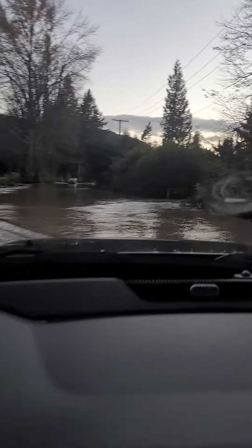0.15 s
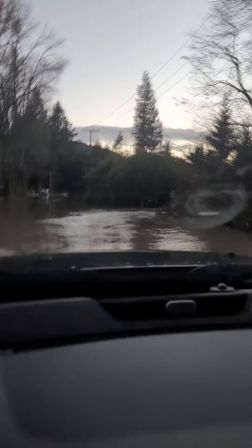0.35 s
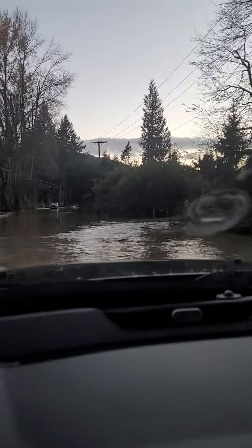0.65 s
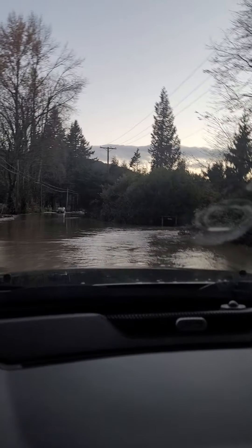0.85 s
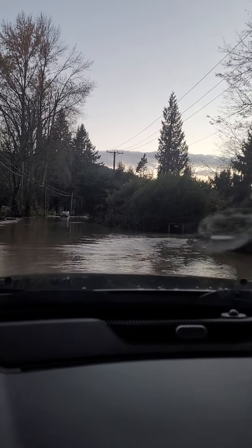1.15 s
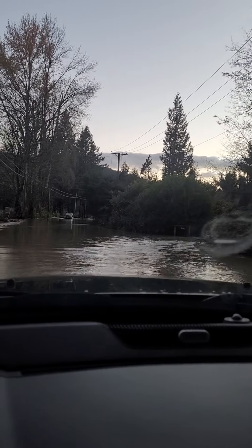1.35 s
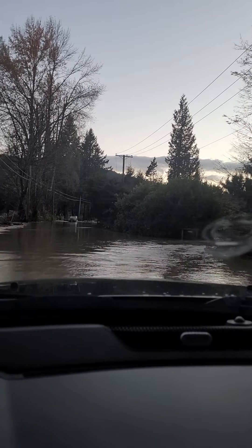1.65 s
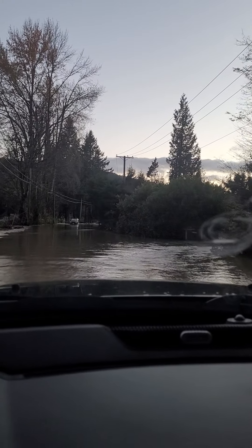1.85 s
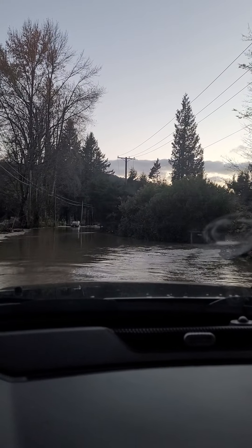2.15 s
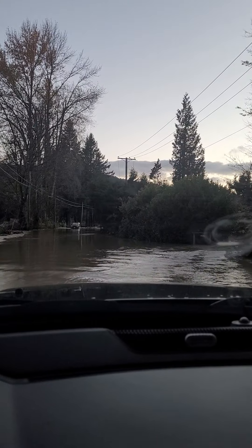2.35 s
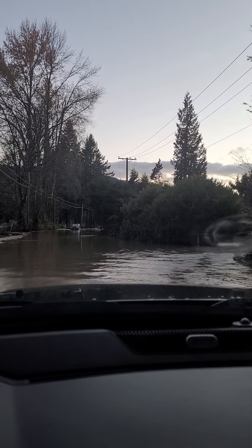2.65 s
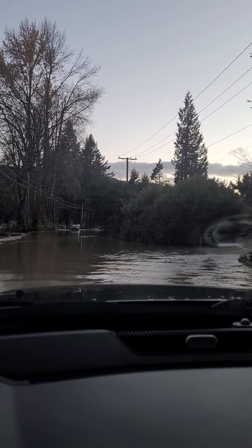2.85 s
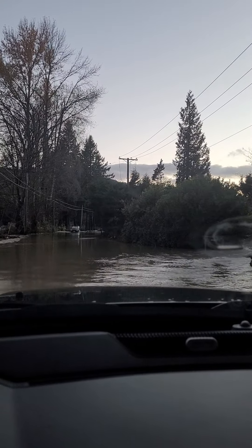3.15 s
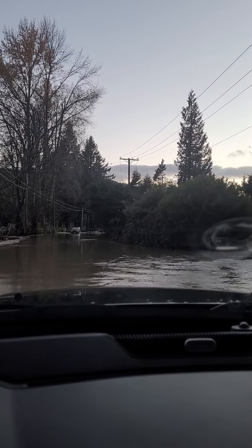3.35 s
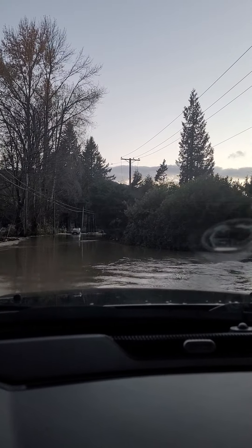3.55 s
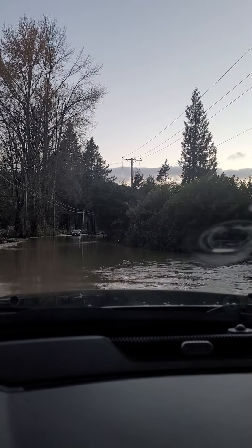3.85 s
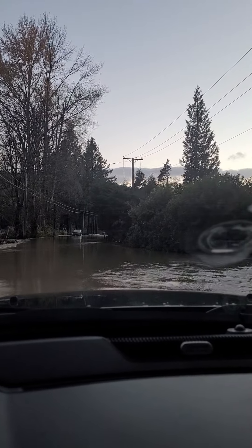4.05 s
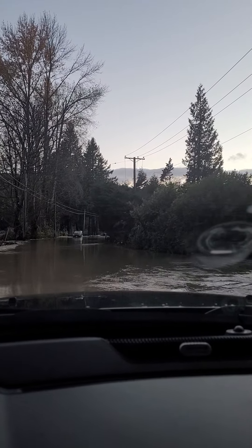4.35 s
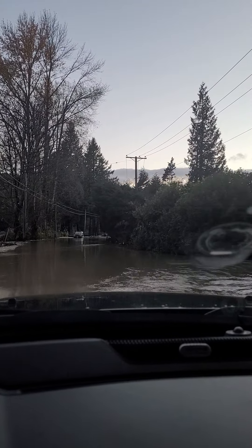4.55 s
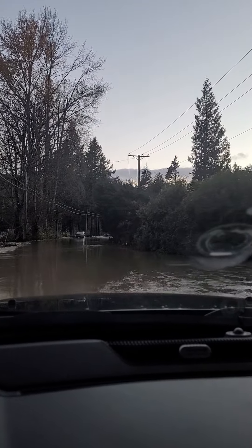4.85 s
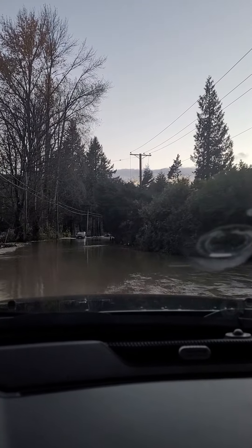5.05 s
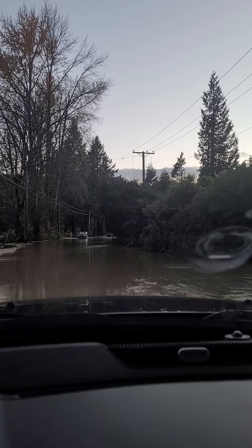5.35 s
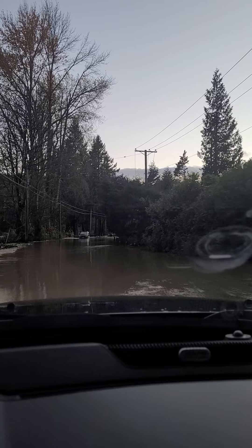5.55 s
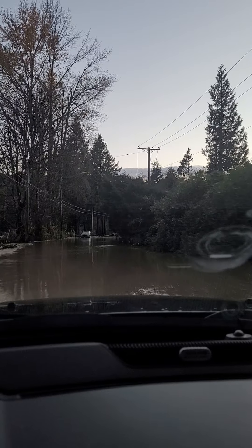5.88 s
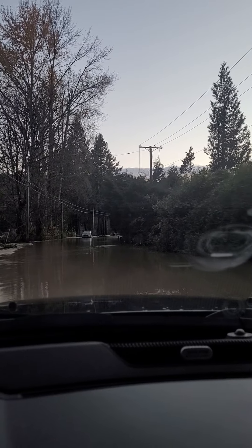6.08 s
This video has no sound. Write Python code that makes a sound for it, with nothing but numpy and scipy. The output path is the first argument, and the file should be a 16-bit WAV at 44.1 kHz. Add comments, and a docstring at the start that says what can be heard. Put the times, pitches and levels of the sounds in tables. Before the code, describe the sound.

A truck creeps through floodwater, heard from inside: low engine drone rising and falling, with water rumbling underneath and hissing, bubbling spray outside.

```python
"""V8 truck wading through a flood

Heard on a hand-held phone in the cabin as the truck creeps along. Engine orders boom while the
revs rise and fall; water rumbles on the floor pan, sprays and bubbles past the doors and splashes
once against the body. Early on, the phone takes a few dull taps near its right microphone."""
import sys
import numpy as np
from scipy import signal
from scipy.fft import rfft, irfft, next_fast_len
from scipy.io import wavfile
from scipy.ndimage import uniform_filter1d

SR = 44100
rng = np.random.default_rng(int(sys.argv[2]) if len(sys.argv) > 2 else 0)


def unload_wav(signal):
    """Save mono or channel-first audio to the path in sys.argv[1] as 16-bit WAV at rate SR, clipped to [-1, 1]."""
    wavfile.write(
        sys.argv[1],
        SR,
        np.round(np.clip(np.atleast_2d(signal).T, -1, 1) * 32767).astype(np.int16),
    )


N = 274302

# Stereo image of the low end at the two microphones. Each row: frequency in Hz, left minus right
# in dB, left phase lead in radians, correlation.
LOW_END_IMAGE = [(45, -2.8, .4, .99), (65, -2.8, .4, .99), (90, -.3, .35, .99), (170, .7, .1, .98),
                 (300, .8, .1, .93), (600, 1.5, .2, .85)]
# Spray at the doors. Each row: time in seconds, level in dB, extra treble fizz in dB.
SPRAY_ENVELOPE = [(0, -41, -2), (.3, -44, -.5), (.6, -42.5, -2), (.8, -40.5, -2.5), (1.1, -40.5, -1),
                  (1.3, -41, -1.5), (1.6, -40.3, -0.5), (2.45, -39, -1), (3.03, -40.5, .5), (3.2, -41, -2),
                  (3.45, -40, 0.5), (3.87, -42, -.5), (4.05, -41.5, 1), (4.5, -43, 2), (5.1, -40, 3),
                  (5.3, -42, 4), (5.45, -41, 5), (5.95, -38.5, 4), (6.22, -40.5, 5)]


def amp(db):
    """Decibels to gain."""
    return 10 ** (np.asarray(db) / 20)


def unit_rms(x):
    """Scales to an rms of one."""
    return x / np.sqrt(np.mean(x ** 2) + 1e-20)


def at_hz(rows, hz, column=1):
    """A table column, interpolated on a log-frequency axis."""
    rows = np.array(rows, float)
    return np.interp(np.log(hz + 1), np.log(rows[:, 0] + 1), rows[:, column])


def at_time(rows, t):
    """The columns of an envelope table at times t."""
    times, *columns = np.transpose(rows)
    return [np.interp(t, times, column) for column in columns]


def drift(t, slow_hz, fast_hz):
    """A random wobble: sines of random phase, the slowest strongest."""
    hz = np.geomspace(slow_hz, fast_hz, num=16)
    sines = np.sin(2 * np.pi * (np.outer(t, hz) + rng.random(len(hz))))
    return unit_rms((sines / np.sqrt(hz)).sum(1))


def water_noise(size, left_db, right_db, correlation, lead, band_hz, patchy_db, flicker_db, shape_db):
    """Stereo noise with random patches and broadband flicker; its mid has unit rms within band_hz."""
    hop = size // 4
    frames, hz = N // hop + 5, np.fft.rfftfreq(size, 1 / SR)
    t = np.arange(frames) * hop / SR
    left_re, left_im, apart_re, apart_im, patches = rng.standard_normal((frames, len(hz), 5)).T
    patches = uniform_filter1d(patches, size=5, axis=0)  # smear over frequency
    patches = unit_rms(uniform_filter1d(patches, size=10, axis=1))  # and over time
    alike = np.clip(correlation(hz), -1, 1)[:, None]
    left = left_re + 1j * left_im
    right = alike * left + np.sqrt(1 - alike ** 2) * (apart_re + 1j * apart_im)
    right *= np.exp(-1j * lead(hz))[:, None]
    spectra = np.array([left * amp(left_db(hz))[:, None], right * amp(right_db(hz))[:, None]])
    spectra *= amp(shape_db(t, hz[:, None]) + patchy_db * patches + flicker_db * drift(t, 2.5, 40.))
    noise = signal.istft(spectra, nperseg=size, noverlap=size - hop)[1][:, :N]
    low, high = (round(edge * N / SR) for edge in band_hz)
    in_band = rfft(noise.mean(0))[low:high]
    return noise / (np.sqrt(2) * np.linalg.norm(in_band) / N)


def knocks(rows, glide, rise, rough):
    """Short wave packets that sag in pitch, their attack `rise` times quicker than their decay."""
    out = np.zeros((2, N))
    t = np.arange(-2000, 2000) / SR
    for peak_s, db, hz, cycles, pan_db in rows:
        age = hz * t / cycles
        body = -np.cos(2 * np.pi * hz * t * (1 - glide * np.clip(age, -1, 1)))
        body *= 1 + rough * uniform_filter1d(rng.standard_normal(len(t)), size=8)
        envelope = np.exp(-(np.where(t < 0, rise, 1) * 2.67 * age) ** 2 / 2)
        gains = amp([[db + min(pan_db, 0)], [db - max(pan_db, 0)]])
        start = round(peak_s * SR) - len(t) // 2
        out[:, start:start + len(t)] += gains * body * envelope
    return out


def engine():
    """Sines on multiples of the engine cycle; each order wavers as combustion varies."""
    # The driver eases on the throttle, holds and lifts off. Each row: time in seconds, cycle rate
    # (half the crank speed) in Hz, fifth-order cabin boom in dB, firing order in dB.
    throttle = [(0, 10.3, -37, -30), (.25, 10.32, -33, -28.3), (.62, 10.73, -26.5, -27),
                (1.0, 10.8, -24.3, -28.7), (1.25, 10.77, -27, -29), (1.9, 10.81, -24, -28.5),
                (2.4, 10.81, -24, -28.5), (2.8, 11.11, -21, -27.5), (3.2, 11.35, -20.3, -25.7),
                (3.85, 11.83, -18.7, -30.3), (4.05, 12.05, -17.6, -29.4), (4.35, 12.57, -15.9, -26.8),
                (4.75, 12.6, -18, -30.5), (5.02, 12.57, -21.7, -28.2), (5.4, 11.87, -22.1, -30.8),
                (5.75, 11.24, -24, -29.5), (6.0, 10.86, -27.2, -29.3), (6.22, 10.74, -25, -31.5)]
    # Weaker orders of the uneven exhaust beat. Each row: multiple of the cycle, level at idle in dB,
    # change in dB per Hz of cycle rate away from idle.
    weak_orders = [(3, -50, 6.0), (4, -36, -2.5), (6, -41, .4), (7, -41, 2.0), (9, -50, 6.0),
                   (10, -45, 3.0), (11, -41, -2.5), (12, -50, 3.0), (13, -40, -3.0), (14, -39, -3.0),
                   (15, -52, 1.5), (16, -39, -4.0)]
    idle_hz = 10.8
    t, control_t = np.arange(N) / SR, np.arange(0, N / SR + .1, .01)
    cycle_hz, boom_db, firing_db = at_time(throttle, control_t)
    unsteady_hz = cycle_hz * (1 + .0015 * drift(control_t, 1.5, 8.))
    turns = np.cumsum(np.interp(t, control_t, unsteady_hz)) / SR
    orders = [(5, boom_db, .3), (8, firing_db, .5)]
    orders += [(order, db + slope * abs(cycle_hz - idle_hz), 1.8) for order, db, slope in weak_orders]
    out = np.zeros((2, N))
    for order, db, waver_db in orders:
        level_db = db + waver_db * drift(control_t, 0.611, 4.5)
        pan_db = at_hz(LOW_END_IMAGE, order * cycle_hz)
        lead = np.interp(t, control_t, at_hz(LOW_END_IMAGE, order * cycle_hz, column=2))
        phase = 2 * np.pi * (order * turns + rng.random())
        for mic, side in enumerate((.5, -.5)):
            gain = np.interp(t, control_t, np.sqrt(2) * amp(level_db + side * pan_db))
            out[mic] += gain * np.sin(phase + side * lead)
    return out


def floor_wash():
    """Water drumming on the floor pan: a low rumble, nearly alike at both microphones."""
    # The wash builds as the truck wades in. Each row: time in seconds, level in dB.
    swell = [(0, -38.5), (.55, -38), (.95, -35), (2.4, -33.5), (3.3, -34.5), (4.5, -34), (5.3, -32),
             (6.0, -34.5), (6.22, -30.5)]
    # Its tone through the floor. Each row: frequency in Hz, relative spectral level in dB.
    tone = [(20, -40), (35, -9), (55, 0), (90, -5.5), (140, -7.5), (200, -7), (300, -6.5), (400, -12),
            (520, -17), (700, -18), (900, -24.5), (1500, -53)]
    rumble = water_noise(size=4096,
                         left_db=lambda hz: at_hz(tone, hz) + at_hz(LOW_END_IMAGE, hz) / 2,
                         right_db=lambda hz: at_hz(tone, hz) - at_hz(LOW_END_IMAGE, hz) / 2,
                         correlation=lambda hz: at_hz(LOW_END_IMAGE, hz, column=3),
                         lead=lambda hz: at_hz(LOW_END_IMAGE, hz, column=2),
                         band_hz=(200, 900), patchy_db=0.56, flicker_db=0.48, shape_db=lambda t, hz: 0)
    return amp(at_time(swell, np.arange(N) / SR)[0]) * rumble


def door_spray():
    """Wide hiss of thrown water; fizz and surges take over toward the treble."""
    # Tone at each microphone. Each row: frequency in Hz, relative spectral level in dB.
    left_tone = [(200, -5.5), (450, -2), (750, 3), (1000, -1), (1600, -1.5), (2600, -0.5), (3400, -2),
                 (3900, -4), (5200, -2.5), (6500, -5), (8400, -20), (11000, -11), (13700, -7), (14800, -10),
                 (16000, -8)]
    right_tone = [(200, -5), (450, -1.5), (850, 2.5), (1050, -0.5), (1250, 3), (1700, 1), (2000, -2.5),
                  (3000, -4.5), (4000, -6), (5200, -8), (7000, -10.5), (9000, -16), (11000, -12.5),
                  (13500, -16), (16000, -10)]
    # Stereo width of the hiss. Each row: frequency in Hz, left-right correlation.
    width = [(300, 0.62), (700, -0.016), (1000, -0.022), (1400, -0.31), (2500, -0.019), (3600, -0.042),
             (16000, -0.011)]
    # Sheets of spray thrown past the doors. Each row: peak time in seconds, treble lift in dB,
    # Gaussian half-width in seconds.
    surges = [(1.44, 4.5, .022), (2.44, 3.5, .015), (2.555, 3, .012), (3.45, 2.5, .015), (4.16, 2, .012),
              (5.05, 2, .012), (5.14, 1.5, .015), (5.454, 2, .008), (5.604, 5.5, .005), (5.88, 3.5, .012),
              (6.155, 3, .015)]

    def treble_db(t, hz):
        """Fizz and surges, faded in up the spectrum."""
        octaves = np.log2(hz / 1550.0 + 1e-9)
        fizz_db = at_time(SPRAY_ENVELOPE, t)[1]
        surge_db = sum(db * np.exp(-((t - peak_s) / span_s) ** 2 / 2) for peak_s, db, span_s in surges)
        return fizz_db * np.clip(octaves / 2.22, 0, 1) + surge_db * np.clip(octaves + .5, 0, 1)

    hiss = water_noise(size=512,
                       left_db=lambda hz: at_hz(left_tone, hz),
                       right_db=lambda hz: at_hz(right_tone, hz),
                       correlation=lambda hz: at_hz(width, hz), lead=np.zeros_like,
                       band_hz=(900, 2500), patchy_db=0.9, flicker_db=0.26, shape_db=treble_db)
    return amp(at_time(SPRAY_ENVELOPE, np.arange(N) / SR)[0]) * hiss


def bubbles(per_s, below_spray_db, spread_db, cycles):
    """Trapped air ringing briefly as it bursts: rising chirps of many sizes, leaning left or right."""
    strength = amp(spread_db * np.minimum(rng.exponential(1, N), 4))
    bursts = strength * (rng.random(N) < per_s / SR)
    pitches_hz = np.geomspace(350, 6500, num=24)
    pitch_index = rng.integers(0, len(pitches_hz), N)
    t = np.arange(3000) / SR
    length = next_fast_len(N + len(t))
    spectra = np.zeros((2, length // 2 + 1), complex)
    for k, hz in enumerate(pitches_hz):
        turns = hz * t
        chirp = np.sin(2 * np.pi * turns * (1 + 0.042 * turns / cycles))
        envelope = turns * np.exp(-3 * turns / cycles)
        spectra[k % 2] += rfft(bursts * (pitch_index == k), length) * rfft(chirp * envelope, length)
    froth = irfft(spectra + 0.77 * spectra[::-1], length)[:, :N]  # each side bleeds into the other
    return amp(at_time(SPRAY_ENVELOPE, np.arange(N) / SR)[0] - below_spray_db) * unit_rms(froth)


def cabin_echoes(x, echo_db, t60_s):
    """Glass and trim throw back quick, dense echoes that ripple the spectrum finely."""
    t = np.arange(2500) / SR
    echoes = rng.standard_normal(len(t)) * (rng.random(len(t)) < .06)
    echoes *= amp(-60 * t / t60_s) * (t > .002)
    response = amp(echo_db) * echoes / np.linalg.norm(echoes) + (t == 0)
    return signal.oaconvolve(x, response[None] / np.linalg.norm(response))[:, :N]


def phone_taps():
    """Dull taps on the phone, close to its right microphone."""
    # Each row: peak time in seconds, peak level on the right in dB, pitch in Hz, decay in cycles,
    # left minus right in dB.
    taps = [(.3101, -13, 2400, 1.2, -20), (.3122, -7, 374, 2.2, -27), (.3185, -17.5, 136, 2.7, -3),
            (.3700, -18, 420, 1.5, -18), (.3749, -17.5, 1280, 2.1, -31), (.5530, 1, 590, 1.74, -36),
            (.5605, -16, 426, 0.79, -20), (1.1232, -12.5, 404, 1.8, -21), (1.1290, -17, 335, 5.9, -14)]
    return knocks(taps, glide=0.39, rise=2.9, rough=.03)


def body_splash():
    """One short, rough slap of water against the body."""
    # Each row: peak time in seconds, level in dB, pitch in Hz, decay in cycles, left minus right in dB.
    slaps = [(1.631, -23, 1500, 6, -5)]
    return knocks(slaps, glide=.22, rise=1.2, rough=.9)


def scene():
    """Everything that reaches the two microphones; spray and bubbles echo in the cabin."""
    thrown_water = door_spray() + bubbles(per_s=300, below_spray_db=4.5, spread_db=3.5, cycles=15.2)
    thrown_water = cabin_echoes(thrown_water, echo_db=-18, t60_s=.07)
    hits = phone_taps() + body_splash()
    return engine() + floor_wash() + thrown_water + hits


def record(dry):
    """The phone cuts off the top end steeply."""
    lowpass = signal.firwin(2047, cutoff=15760, window=("kaiser", 9), fs=SR)
    return signal.oaconvolve(dry, lowpass[None], "same")


dry = scene()
out = record(dry)
unload_wav(out)
```